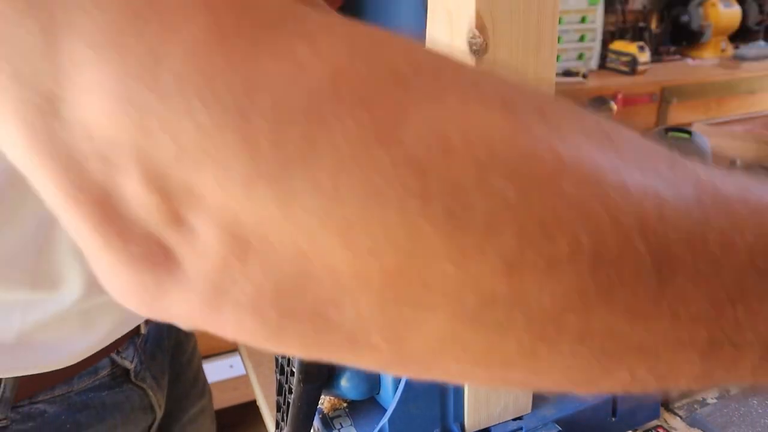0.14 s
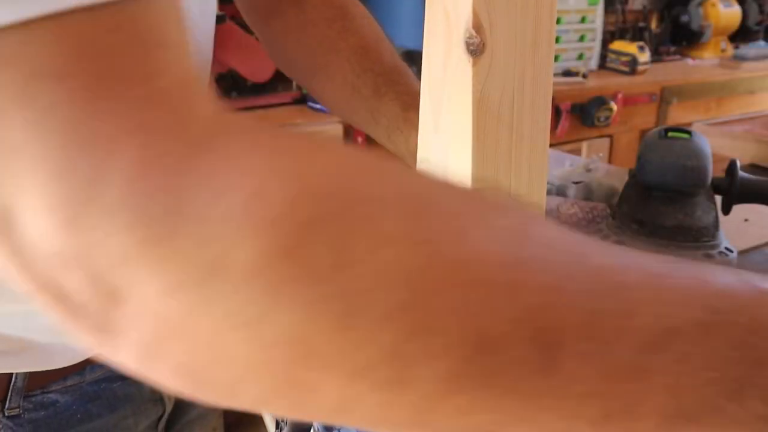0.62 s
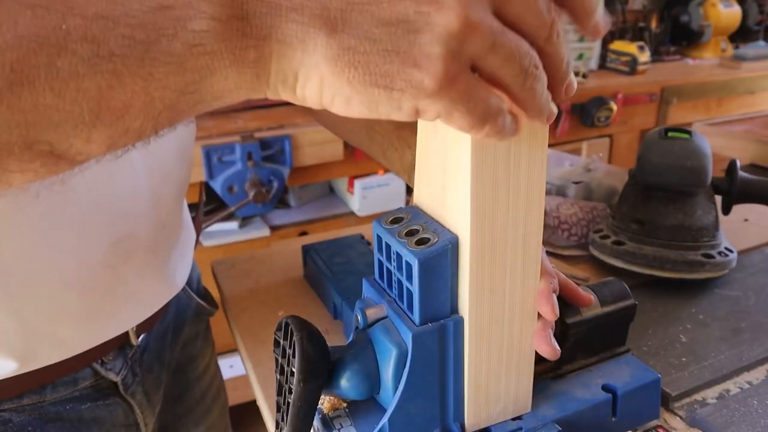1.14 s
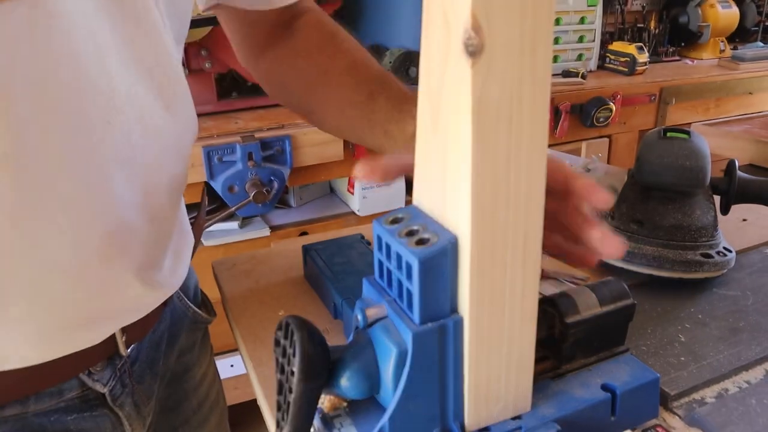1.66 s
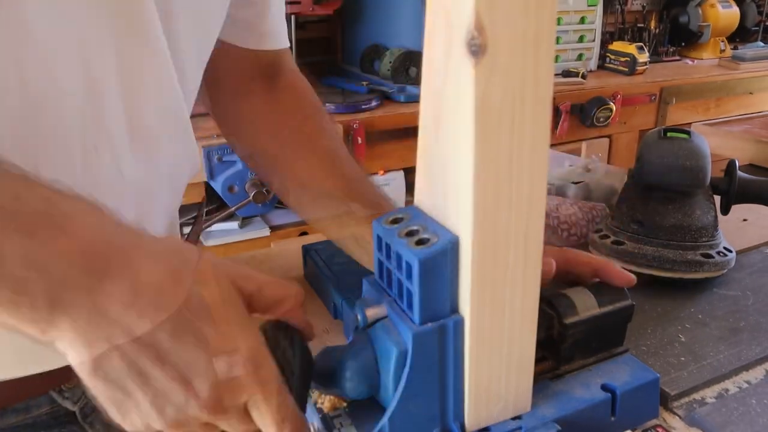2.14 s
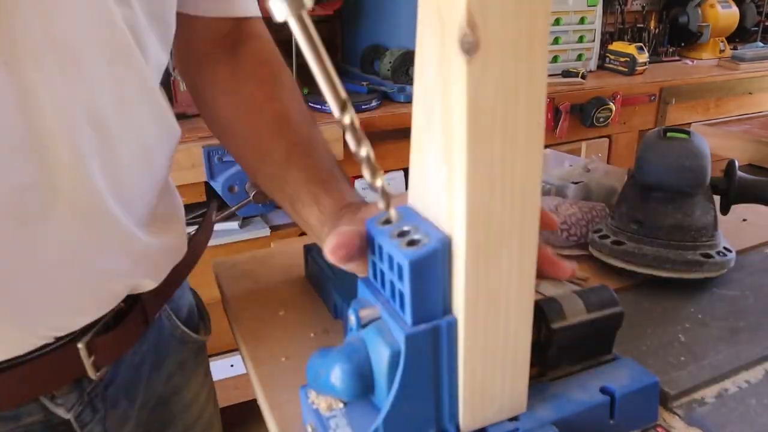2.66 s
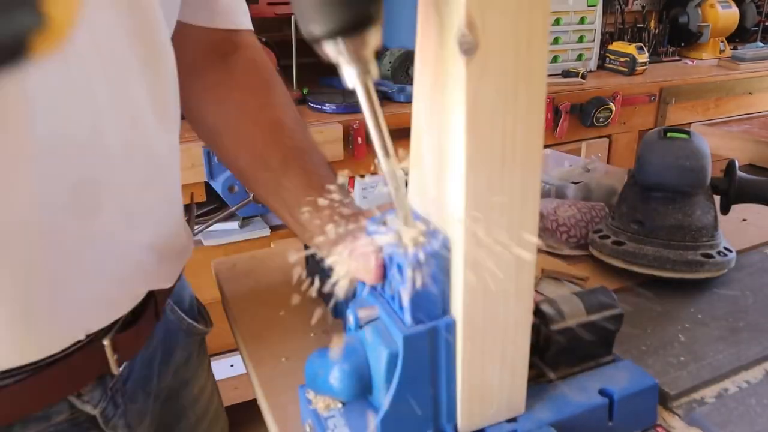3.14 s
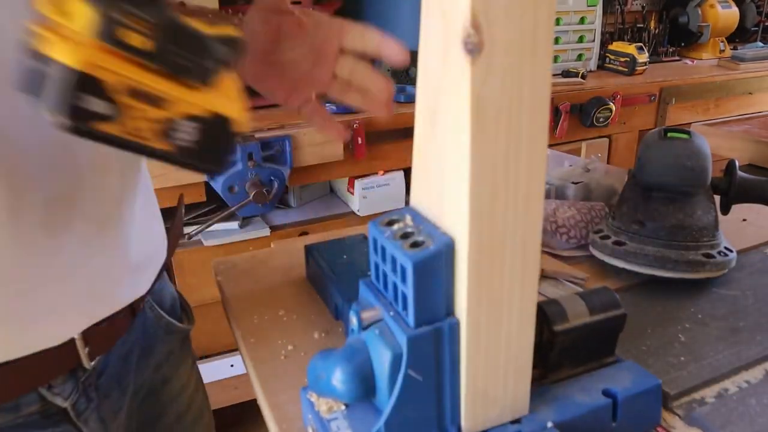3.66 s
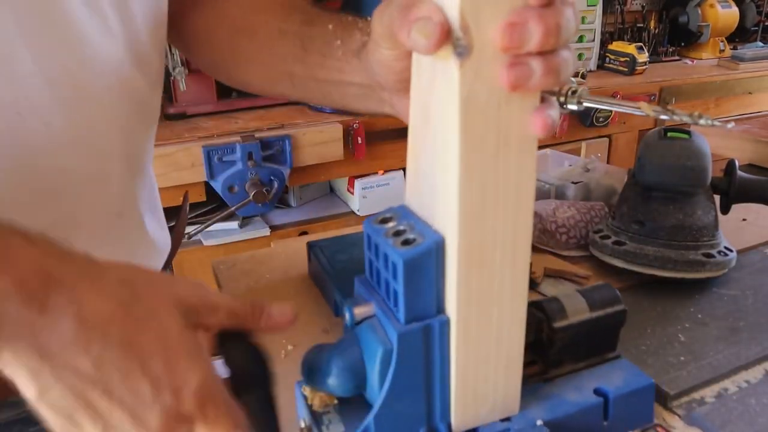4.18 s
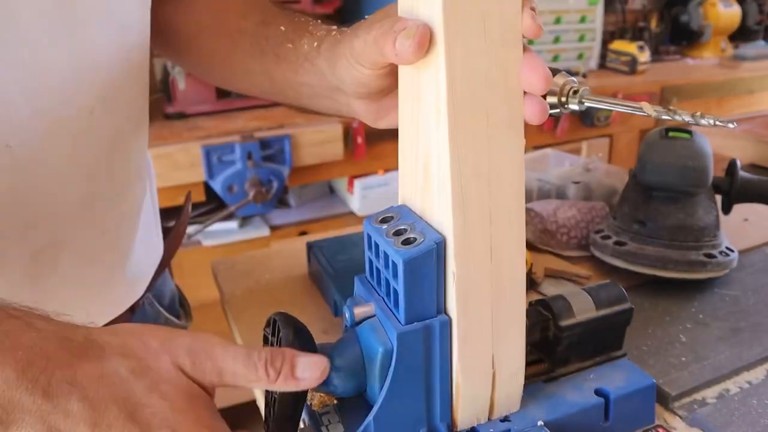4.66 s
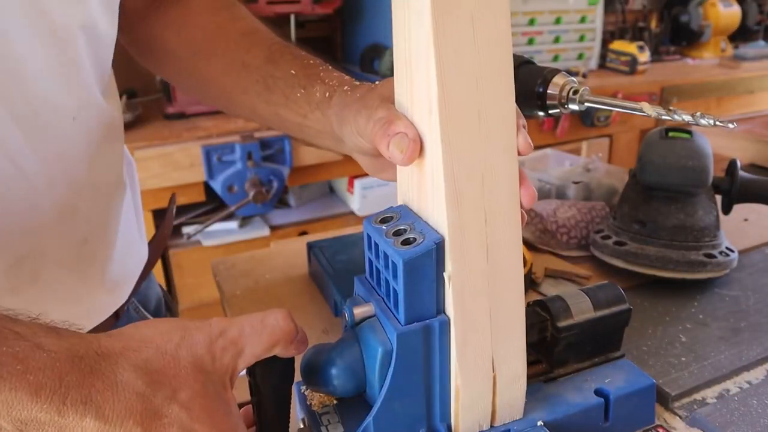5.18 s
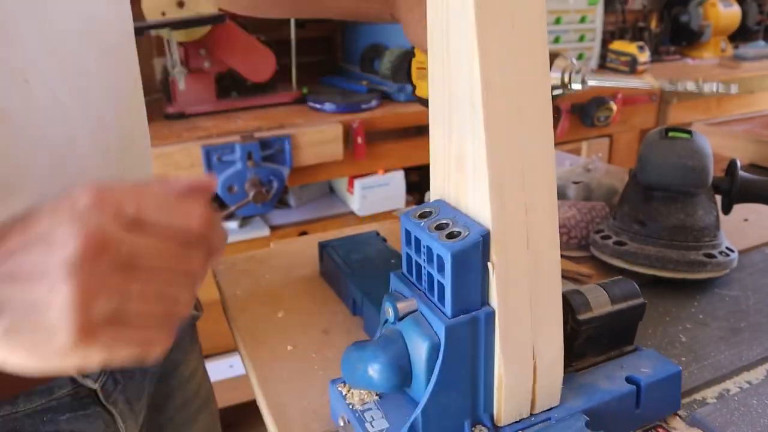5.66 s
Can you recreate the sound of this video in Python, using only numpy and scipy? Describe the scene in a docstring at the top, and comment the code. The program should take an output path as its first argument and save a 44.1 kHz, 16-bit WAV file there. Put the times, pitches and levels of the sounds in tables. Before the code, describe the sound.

Very close stereo at a workshop bench. A loud wooden crack comes early, followed by near quiet with soft cloth rustle and low puffs of air. More knocks and slides lead into a high-pitched cordless drill burst that bites wood twice and stops abruptly. Afterwards a clamp clacks open, the board knocks and scrapes, and a dense clatter with a bright metal chink ends it.

```python
"""Drilling two holes at a workshop bench

A cordless drill bores two holes in one short burst into a clamped board; its sound is built from
motor and gear tones over shaped noise. Before and after it the board, clamp and drill knock and scrape:
bursts of noise set off their resonances, and low thumps go with the heaviest knocks. Moving arms rustle
(flickering noise bands) and push puffs of air (low swings) onto a close stereo microphone whose treble
is wide and whose bass is centred."""
import sys
import numpy as np
from scipy import signal
from scipy.fft import rfft, irfft
from scipy.io import wavfile
from scipy.ndimage import uniform_filter1d

SR = 44100
rng = np.random.default_rng(int(sys.argv[2]) if len(sys.argv) > 2 else 0)


def transcribe(u):
    """Save the signal u as a 16-bit wav file named by the first command-line argument.

    u: samples, shape (n,) or (channels, n), limited to [-1, 1]; the rate is SR.
    q: integer samples, one column per channel.
    """
    v = np.clip(np.atleast_2d(u).T, -1, 1)
    q = np.round(v * 32767).astype(np.int16)
    wavfile.write(sys.argv[1], SR, q)


def boost(x):
    """Linear amplitude factor 10**(x/20) for a level x in decibels (scalar or array-like)."""
    u = np.asarray(x, float) / 20
    return 10 ** u


N = 255780  # length [samples]

# How hard the air is stirred: (time [s], level [dB], left minus right [dB])
AIR_STIR = [(0.0, -53, 2.5), (0.45, -48.5, 1), (0.53, -30, -1), (0.62, -45.5, 0.5), (0.98, -49.5, 2),
            (1.1, -48, 8.5), (1.42, -38.5, 9.5), (1.63, -44.5, 2), (1.95, -39, 5), (2.1, -41.5, -0.5),
            (2.45, -28.5, 0), (2.73, -37, 3.5), (2.96, -34.5, 0), (3.19, -38, -0.5), (3.22, -64, 4),
            (3.32, -56, 4), (3.35, -39, 3), (3.44, -35.5, -0.5), (3.6, -45, 6.5), (3.86, -54, 1.5),
            (4.15, -65, -1.5), (4.3, -40.5, 1), (4.39, -34, 1), (4.5, -49, 0), (5.0, -44, 0.5),
            (5.48, -34.5, 1.5), (5.56, -52, -3), (5.63, -27.5, 3), (5.8, -38.5, 0)]
# A body leaning past changes the deep boom: (time [s], added level [dB], half-width [s]); negative is a dip
BOOM_SWELLS = [(1.1, 17, 0.14), (1.4, 16.5, 0.14), (2.42, 19.5, 0.04), (2.68, 3.5, 0.14), (2.82, 12, .04),
               (4.12, -28.5, 0.19)]
# Puffs of air, and low thumps that go with the heaviest knocks:
# (time [s], peak before panning [dB], pitch [Hz])
PUFFS_AND_THUMPS = [(0.449, -10, 229), (0.4531, -11, 215), (1.053, -29, 150), (1.074, -27.5, 105),
                    (1.172, -27.5, 109), (1.207, -26, 145), (1.309, -20, 129), (1.366, -19, 182),
                    (1.391, -18, 181), (1.415, -25, 144), (1.451, -21, 122), (1.498, -27.5, 129),
                    (1.544, -33.5, 170), (1.673, -26.5, 122), (1.847, -22.5, 172), (1.871, -20, 287),
                    (1.888, -24.5, 139), (1.905, -18, 226), (1.953, -25.5, 147), (1.984, -30, 221),
                    (2.385, -14.5, 185), (2.396, -19, 185), (2.422, -19, 170), (3.713, -34, 234),
                    (3.868, -25, 214), (3.991, -38.5, 104.1), (4.298, -30, 240), (4.322, -28, 330),
                    (4.336, -20, 154), (4.347, -18, 300), (4.362, -24.5, 181), (4.378, -20, 357),
                    (4.395, -22, 420), (4.425, -33, 280), (4.438, -18, 260), (4.46, -29, 134),
                    (4.495, -29, 191), (4.519, -31, 237), (4.571, -23.5, 292), (4.579, -15.5, 300),
                    (4.613, -23, 226), (4.745, -23, 217), (4.783, -15, 360), (4.939, -26, 161),
                    (4.968, -20, 242), (5.046, -37.5, 164), (5.083, -19, 327), (5.153, -20.5, 175),
                    (5.207, -25, 102), (5.257, -24, 160), (5.292, -17, 168), (5.347, -20.5, 173),
                    (5.365, -14, 363), (5.404, -14.5, 187), (5.409, -17.5, 230), (5.452, -19, 220),
                    (5.497, -22, 252), (5.676, -15, 312), (5.682, -13, 280), (5.693, -17, 263),
                    (5.701, -20, 300), (5.713, -15.5, 332), (5.754, -15.5, 258), (5.766, -14, 460),
                    (5.791, -14.5, 420)]
# How busy the hands are: (time [s], level [dB])
HAND_RUSTLE = [(0.0, -59), (0.43, -58.5), (0.72, -53), (0.84, -61.5), (1.5, -56.5), (2.05, -52), (2.3, -42),
               (2.69, -45.5), (2.9, -51), (3.69, -76), (3.9, -58), (4.28, -53.5), (4.6, -48), (4.76, -48.5),
               (5.23, -52), (5.4, -44), (5.5, -34), (5.6, -38), (5.67, -56), (5.8, -51.5)]
# Sleeves brushing: (start [s], length [s], level [dB])
SLEEVE_SWISHES = [(0.0, 0.4, -59.5), (0.646, 0.071, -63), (1.03, 0.084, -65.5), (1.231, .1, -67.5),
                  (1.69, 0.18, -62), (2.074, 0.047, -64), (2.23, 0.11, -66), (2.452, 0.33, -61),
                  (2.79, 0.17, -67), (3.686, 0.33, -72.5), (4.004, 0.17, -69.5), (4.375, 0.17, -52),
                  (4.702, 0.12, -61.5), (5.103, 0.31, -64), (5.412, 0.41, -57)]
# A small metal part chinks and bounces: (time [s], peak [dB])
METAL_TICKS = [(5.562, -16.5), (5.5664, -1.5), (5.574, -17.5), (5.5805, -27.5), (5.586, -27)]

# Weight and brightness below are bass and treble relative to the peak of the middle band.
# Knocks on the board: (time [s], peak [dB], weight [dB], brightness [dB], time to fall 60 dB [s])
BOARD_KNOCKS = [(0.44, 0, -20.5, -10, 0.3), (0.455, -6, -8, -10, 0.08), (0.491, -10.5, -1.5, -6.5, 0.12),
                (0.648, -38, 3.5, -3, 0.033), (0.671, -36.5, -3, -1.5, 0.033), (0.69, -36, -20, -4, 0.086),
                (1.71, -39.5, -10, 2.5, 0.04), (2.193, -20.5, -15, -5, 0.11), (2.235, -15, 0, -8.5, 0.089),
                (2.368, -16, 6, -18.5, 0.42), (2.37, -23, -22, 12, 0.017), (2.439, -2, -4.5, -29, 0.085),
                (2.623, -24, -14, 6, 0.021), (2.885, -8.5, -29.5, -2.5, 0.055),
                (3.821, -18, -35.5, -17, 0.095), (4.298, -36, 6, 5, 0.043), (4.44, -34, -9, 2, .025),
                (4.539, -1.5, -17, -4.5, 0.065), (4.631, -0.5, -46, -5.5, 0.034),
                (4.681, -41.5, -11, 11.5, 0.034), (4.784, -22.5, -28, -13, 0.097),
                (4.842, -19, -39.5, -14, 0.064), (4.862, -22.5, -35, -17, 0.084),
                (5.318, -6.5, -39, -17.5, 0.07), (5.415, -13.5, -31, -1, 0.04), (5.431, -25, -5, -9.5, .03),
                (5.502, -15, -7, -13, .04), (5.511, -19, -11, 1, 0.025), (5.545, -13.5, -26, 5, 0.033),
                (5.566, -16.5, -9, 5.5, 0.038), (5.629, -10.5, -4, -19, 0.15), (5.644, -7, -4.5, -9.5, 0.1),
                (5.651, -14, -11, -7, 0.03), (5.681, -19, -3, -19, 0.055), (5.697, -22, 6, -17.5, 0.077),
                (5.715, -25, -13, -13, .04), (5.736, -28.5, -5, -12.5, .025), (5.766, -31, 4, -20, .05),
                (5.792, -17.5, -19, -10, 0.043)]
# Blows on the metal clamp: (time [s], peak [dB], weight [dB], brightness [dB], time to fall 60 dB [s])
CLAMP_KNOCKS = [(4.0695, -11, -21, 1, 0.04), (4.991, -12, -18, -5, 0.035)]
# The brake snaps in the drill's casing and rebounds:
# (time [s], peak [dB], weight [dB], brightness [dB], time to fall 60 dB [s])
BRAKE_SNAPS = [(3.6643, -19.5, -20, 9.5, .01), (3.6805, -42, -20, 10, 0.0084)]
# The clamp lever springs open: (time [s], peak [dB], weight [dB], brightness [dB], time to fall 60 dB [s])
LEVER_SPRINGS = [(4.247, -10, -18.5, 4.2, 0.019)]
# Slides along the board, and the rattling tail of the first knock:
# (time [s], peak [dB], weight [dB], brightness [dB], length [s])
BOARD_SLIDES_AND_RATTLE = [(0.451, -12.5, 2.5, -13, 0.033), (0.471, -17, -5, -8.5, 0.026),
                           (0.505, -17.5, -2.5, -10, 0.027), (2.246, -24.5, -3, -16, 0.03),
                           (2.285, -29.5, -3, -7, 0.03), (2.325, -26.5, -5, -2.5, 0.025),
                           (2.354, -12, -20, -14, 0.017), (2.45, -4.5, -25, -17, 0.012),
                           (2.586, -33.5, 10.5, 8, 0.011), (2.665, -28, -12, 1.5, 0.0084),
                           (2.856, -19, -12, -6.5, 0.012), (2.869, -9, -3.5, -13.5, 0.014),
                           (3.823, -22.5, 1, -10.5, 0.0093), (4.049, -18.5, -21, -16, 0.029),
                           (4.2, -11.5, -21.5, -7, 0.025), (4.233, -9, -3, -12, 0.01),
                           (4.491, -38.5, -4, 5, 0.02), (4.718, -26.5, -13, -17, 0.019),
                           (5.063, -27, 1.5, -15, 0.0077), (5.177, -32, -15, 7, 0.011),
                           (5.383, -21.5, -10, -6.5, 0.011), (5.452, -14, -2, -12.5, 0.026),
                           (5.47, -13.5, -10, -7, 0.0089), (5.499, -17.5, -3, -23, 0.016),
                           (5.575, -15, -18, -15, 0.012), (5.616, -17, -13, -1, 0.031),
                           (5.653, -16.5, -2, -13, 0.034)]
# Slides along the metal clamp, and the soft onset and tail of the clamp blow:
# (time [s], peak [dB], weight [dB], brightness [dB], length [s])
CLAMP_SLIDES_AND_TAIL = [(4.063, -12.5, -15.5, 0.5, 0.008), (4.221, -10.5, -5.5, -7.5, 0.021),
                         (4.077, -24.5, -18, -12, 0.02), (4.15, -30.5, -9.5, -9, 0.01),
                         (5.024, -30.5, -12, -7, 0.011), (5.526, -18, -22, -12, 0.012)]
# Resonances of the board: (pitch [Hz], width [Hz], level [dB])
BOARD_BODY = [(226, 124, 2), (420, 186, 0), (721, 304, 6.5), (860, 130, -9.5), (1117, 230, -18.5),
              (1615, 2000, -22), (1790, 940, -13.5), (2455, 190, -20), (2840, 240, -19), (3196, 210, -12.5),
              (3670, 110, -32.5), (4490, 3000, -16.5), (4640, 780, -20)]
# Resonances of the clamp: (pitch [Hz], width [Hz], level [dB])
CLAMP_BODY = [(804.4, 370, -5.5), (1204, 200, 0.5), (2140, 450, 0.5), (2770, 170, -12), (3820, 170, -10),
              (4460, 350, -27)]
# Resonances of the drill's casing: (pitch [Hz], width [Hz], level [dB])
CASING_BODY = [(1464, 500, -11), (3060, 620, 1.5), (3770, 500, 3), (4190, 600, 1)]
# Resonances of the clamp lever: (pitch [Hz], width [Hz], level [dB])
LEVER_BODY = [(812, 250, -3.5), (1880, 200, 0), (3100, 240, 0), (4200, 160, -8.5)]

# The two holes: (bit bites [s], bit is pulled back [s], whine as it bites [dB], lower-gear growl at full depth [dB])
DRILLED_HOLES = [(2.93, 3.111, -17.5, 2.5), (3.364, 3.531, -21.5, 17)]
# Lines of the motor whine: (multiple of the whine pitch [ratio], level [dB])
WHINE_LINES = [(1, 3), (.986, -10), (1.015, -24)]
# Tone colour of the rush as it is heard, with its top cut off steeply: (pitch [Hz], level per Hz [dB])
HEARD_RUSH_COLOUR = [(290, -57.5), (500, -14), (1530, -8), (1830, -7.5), (2010, -10.5), (3640, -10.5),
                     (3960, -10.5), (5140, -13.5), (10100, -13.5), (11800, -9), (12300, -15.5),
                     (14500, -51)]
# Tone colour of the chips: (pitch [Hz], level per Hz [dB])
CHIP_COLOUR = [(150, -29), (400, -4.5), (1300, -8.5), (3000, -11.5), (4500, -34)]
# Bands in which wood fibres tear by turns: (low edge [Hz], high edge [Hz])
TEAR_BANDS = [(150, 700), (700, 1700), (1700, 4500)]

# Stereo width of the air: (pitch [Hz], side filter gain [dB])
AIR_WIDTH = [(60, -25), (200, -23), (700, 3.5)]
# Stereo width of hands and contacts: (pitch [Hz], side filter gain [dB])
HANDS_WIDTH = [(60, -30), (300, -28.5), (700, -18), (1300, -3.5), (4400, 4.5), (15000, 8.5)]
# Stereo width of the drill and ticks: (pitch [Hz], side filter gain [dB])
DRILL_WIDTH = [(60, -9), (300, -21.5), (1300, -7), (4400, -1), (15000, -1)]

# Moments of the drill [s]; it coasts from LET_GO_S to STOP_S
TRIGGER_S, LET_GO_S, STOP_S, BRAKE_S = 2.918, 3.625, 3.65, 3.664
# Levels: (running free [dB], added while cutting [dB], added by the starting jolt [dB])
RUSH_DB, CUT_DB, SIZZLE_DB = (-31, 3, 5.5), (-43, 8, 13), (-43, 6, 2.5)
MESH_DB, LOWER_DB = (-28.5, -8.5, 5), (-35, -9.5, 0)
GEAR_COAST_SLIP_PER_S = 1.1  # share of pitch lost per second: the gears wind down faster than the whine


def level(x):
    """Scale to an rms of one, judged on the first row."""
    return x / np.sqrt(np.mean(np.atleast_2d(x)[0] ** 2))


def band_level(x, lo_hz, hi_hz):
    """Scale so that one band of the first row has an rms of one."""
    return x / np.std(band(x[0], lo_hz, hi_hz))


def curves(table):
    """Draw straight lines between table rows, one value per sample for each column."""
    s, *columns = np.transpose(table)
    return [np.interp(np.arange(N) / SR, s, column) for column in columns]


def colour(x, points):
    """Filter a sound by (pitch [Hz], gain [dB]) points."""
    hz, db = np.transpose(points)
    f = np.fft.rfftfreq(x.shape[-1], 1 / SR) + 1
    gain = boost(np.interp(np.log(f), np.log(hz), db))
    return irfft(rfft(x) * gain, x.shape[-1])


def band(x, lo_hz, hi_hz):
    """Keep only the sound between two pitches."""
    return signal.sosfilt(signal.butter(2, [lo_hz, hi_hz], "band", fs=SR, output="sos"), x)


def hiss(lo_hz, hi_hz):
    """Two unrelated noises in one band, for mid and side."""
    return level(band(rng.standard_normal((2, N)), lo_hz, hi_hz))


def walk(rate):
    """Random levels held for 1 / rate seconds, then smoothed twice; rms of one."""
    k = int(SR / rate)
    steps = np.repeat(rng.standard_normal(N // k + 1), k)
    return level(uniform_filter1d(uniform_filter1d(steps, k), k)[:N])


def fall_db(t, start, t60):
    """Level in dB that falls steadily after start, by 60 dB every t60 seconds."""
    return -60 * np.maximum(t - start, 0) / t60


def bump(t, centre, width):
    """A smooth hump of height one."""
    return np.exp(-((t - centre) / width) ** 2)


def after(t, start, tau):
    """A jump to one at start that dies away exponentially."""
    return (t >= start) * np.exp(-np.maximum(t - start, 0) / tau)


def add(out, s, sound):
    """Mix a short sound in at s seconds."""
    i = int(s * SR)
    out[:, i:i + sound.shape[1]] += sound[:, :N - i]


def sides(pan_db):
    """Left and right gains whose ratio is pan_db."""
    return boost(np.array([pan_db, -pan_db]) / 2)


def stereo(mid_side, width):
    """Left and right from mid and side; the width table sets how much side each pitch gets."""
    return mid_side[0] + np.array([[1], [-1]]) * colour(mid_side[1], width)


def puffs_and_thumps(pan_db):
    """Air hitting the microphone and the thump of heavy knocks: one or two low swings, gone at once."""
    out, t = np.zeros((2, N)), np.arange(2048) / SR
    turns_per_db = 0.03  # a one-sided swing reaches the far port late
    for (s, db, hz), turn in zip(PUFFS_AND_THUMPS, rng.random(len(PUFFS_AND_THUMPS))):
        x = t * hz / 0.43
        ports = turn + turns_per_db * pan_db[int(s * SR)] * np.array([[.5], [-.5]])
        swing = x ** 2 * np.exp(-2 * x) * np.sin(2 * np.pi * (hz * t + ports))
        swing = band(swing, 92, 1740)
        add(out, s, boost(db) * swing / np.abs(swing).max())
    return out


def air():
    """Stirred air: a deep centred boom, a lumpy flutter above it and single low swings, at times one-sided."""
    (stir_db, pan_db), t = curves(AIR_STIR), np.arange(N) / SR
    boom_db = -53 + 0.28 * (stir_db + 48.0)  # -53 dB where the stir is -48 dB
    boom_db = boom_db + sum(db * bump(t, s, width) for s, db, width in BOOM_SWELLS)
    narrow = level(band(hiss(45.7, 50.8)[0], 40, 59.6))
    boom = boost(boom_db) * level(narrow + 2.3 * hiss(30, 75)[0])
    flutter = boost(stir_db) * level(boost(4.2 * walk(45)) * hiss(50, 298))
    return boom + sides(pan_db) * (stereo(flutter, AIR_WIDTH) + puffs_and_thumps(pan_db))


def swishes():
    """Sleeves brushing: loudness that rises and falls smoothly for each stroke."""
    t, out = np.arange(N) / SR, 0
    for s, length, db in SLEEVE_SWISHES:
        edge_s = 0.33 * length  # time to fade in or out
        inside = np.minimum(t - s, s + length - t)
        out = out + boost(db) * np.clip(inside / edge_s + .5, 0, 1) ** 2
    return out


def rustle():
    """Hands rustle low and sleeves swish high: three noise bands that partly flicker together."""
    (busy_db,), swish = curves(HAND_RUSTLE), swishes()
    low = boost(busy_db)
    middle = boost(-61 + 0.75 * (busy_db + 50.0)) + boost(-6.5) * swish  # hands part: -61 dB at a busyness of -50
    top = boost(-76.5) + swish
    out, flicker = 0, walk(40)
    for gain, lo_hz, hi_hz in ((low, 400, 1610), (middle, 2000, 5130), (top, 6200, 13600)):
        flicker_db = 1.5 * flicker + 1.2 * walk(15)
        out = out + gain * boost(flicker_db) * hiss(lo_hz, hi_hz)
    return stereo(out, HANDS_WIDTH)


def shudder():
    """The bench top shudders once: a low tone that swells and rings out, lopsided when it swings hard."""
    peak_s, db, hz, rise_s, t60 = 2.585, -18, 51, 0.065, 0.75
    octave_db = -9.5
    t = np.arange(N) / SR - peak_s
    envelope = np.where(t < 0, np.exp(-(t / rise_s) ** 2), boost(fall_db(t, 0, t60)))
    phase = 2 * np.pi * hz * t + .4 * walk(13)
    return boost(db) * envelope * (np.sin(phase) + boost(octave_db) * envelope * np.sin(2 * phase))


def ticks():
    """A small metal part chinks and bounces: dry treble clicks of quickly fading noise."""
    out, t = np.zeros((2, N)), np.arange(512) / SR
    for s, db in METAL_TICKS:
        click = band(rng.standard_normal((2, len(t))) * np.exp(-t / 0.00073), 5800, 13000)
        add(out, s, boost(db) * stereo(click / np.abs(click[0]).max(), DRILL_WIDTH))
    return out


def resonances(body, size):
    """How strongly a body answers each pitch, with its modes slightly detuned for every contact."""
    f = np.fft.rfftfreq(size, 1 / SR) + 1
    detune = 1 + .025 * rng.standard_normal(len(body))
    modes = 0
    for k, ((hz, width, db), d) in enumerate(zip(body, detune)):
        modes = modes + (-1) ** k * boost(db) / (1 + 1j * (f - (hz * d) ** 2 / f) / width)
    # countless small modes fill the valleys between the strong ones
    return modes + boost(-24.0) / (1 + 1j * f / 4000)


def ring(body, envelope, db, part_dbs, tick, top_fade):
    """A tick and a noisy contact force ring a body's modes; the contact itself is heard at the top."""
    size = len(envelope)
    modes = resonances(body, size)
    force = rng.standard_normal((2, size))
    force[:, 50:56] += tick * np.array([[1], [.4]]) * np.hanning(8)[1:-1]
    blow = np.zeros((2, size))  # the slower push of the whole part rings the low modes
    blow[:, 50:74] = 1.5 * tick * np.array([[1], [.3]]) * np.hanning(24)
    solid = irfft(rfft((force + blow) * envelope) * modes, size)
    rattle = irfft(rfft(force * envelope ** .8) * modes, size)  # loose parts keep the treble rattling longer
    parts = (band(solid, 312, 1840), band(solid, 89, 440), band(rattle, 1300, 6500),
             band(force * envelope ** top_fade, 6000, 10500))
    out = 0
    for part, part_db in zip(parts, (0, *part_dbs)):
        out = out + boost(db + part_db) * part / np.abs(part[0]).max()
    return stereo(out, HANDS_WIDTH) * np.linspace(1, 0, size)


def contact(weight_db, bright_db, top_db):
    """Bass, treble and top of one contact; the top follows the brightness."""
    return weight_db, bright_db, top_db + 1.14 * bright_db


def knocks(table, body, crack_s=0.0022):
    """Sharp blows: a hard first few milliseconds, then rattling that fades."""
    out, t = np.zeros((2, N)), np.arange(16384) / SR
    for s, db, weight_db, bright_db, t60 in table:
        attack = np.minimum(t / 0.0021, 1) ** 1.54
        envelope = attack * (np.exp(-t / crack_s) + 0.26 * boost(fall_db(t, 0, t60)))
        parts = contact(weight_db, bright_db, top_db=-11.5)
        add(out, s, ring(body, envelope, db, parts, tick=2.4, top_fade=1.7))
    return out


def scrapes(table, body):
    """Short slides, and the soft parts of some blows: the force swells, holds unevenly and lets go."""
    out, t = np.zeros((2, N)), np.arange(8192) / SR
    for s, db, weight_db, bright_db, length in table:
        catches = boost(5.65 * np.repeat(rng.standard_normal(128), 64))
        swell = np.minimum(t / 0.0012, 1) * np.minimum(0.35 + t / length, 1)
        envelope = swell * boost(fall_db(t, length, 0.025)) * catches
        parts = contact(weight_db, bright_db, top_db=-10.5)
        add(out, s, ring(body, envelope, db, parts, tick=0, top_fade=1.0))
    return out


def motor():
    """The motor spins up, sags and grows muffled as the bit sinks, races when freed and coasts at the end."""
    t = np.arange(N) / SR
    free_hz, spin_up_hz, spin_up_s = 11435, 1964, .029  # whine pitch, how far below it starts, time to rise
    sag_hz, overshoot_hz, settle_s = 300, 330, .08  # sag at full depth; the freed motor races, then settles
    free_whine_db, buried_db = -25, -13.5
    bite_s, clear_s = .02, 0.13  # cutting fades in before the bite and out after the pull
    coast = np.clip(t - LET_GO_S, 0, STOP_S - LET_GO_S)  # seconds spent coasting
    lag = np.exp(-(np.maximum(t - TRIGGER_S, 0) / spin_up_s) ** 1.5)
    hz = free_hz - spin_up_hz * lag - 7700 * coast
    # the whine is faint until the motor is nearly up to speed
    whine_db = free_whine_db - 30 * np.exp(-((t - TRIGGER_S) / spin_up_s) ** 4) - 300 * coast
    cutting, depth, growl_db = 0, 0, 0
    for bite, pull, db, deep_db in DRILLED_HOLES:
        inside = (t >= bite) & (t < pull)
        sunk = inside * (t - bite) / (pull - bite)
        hz = hz - sag_hz * sunk + overshoot_hz * after(t, pull, settle_s)
        whine_db = whine_db + inside * (db - free_whine_db) + buried_db * (sunk + after(t, pull, 0.018))
        cutting = cutting + np.clip(np.minimum((t - bite) / bite_s + 1, (pull - t) / clear_s + 1), 0, 1)
        depth = depth + sunk
        growl_db = growl_db + deep_db * (sunk + after(t, pull, 0.052))
    hz = uniform_filter1d(hz, size=700)  # the rotor's inertia smooths every change
    return hz, whine_db, cutting, depth, growl_db, after(t, TRIGGER_S, 0.034), coast


def tones(turns, orders, blur, waver_db):
    """Lines at multiples of a rotation; each wobbles in phase and level, differently in mid and side."""
    out = np.zeros((2, N))
    for row in out:
        for k, db in orders:
            loudness = np.sqrt(2) * boost(db + waver_db * walk(90))
            row += loudness * np.sin(2 * np.pi * k * turns + blur * walk(160))  # blur in radians
    return out


def motor_whine(hz, whine_db, cutting):
    """The high motor tone, blurred more while the bit cuts."""
    t = np.arange(N) / SR
    lines = tones(np.cumsum(hz) / SR, WHINE_LINES, blur=.7 + 1.4 * cutting, waver_db=4.0)
    return boost(whine_db + fall_db(t, STOP_S, .02)) * lines


def gear_mesh(hz, mesh_db, cutting, depth, coast):
    """Meshing gear teeth: quieter and more wobbly in the cut, then louder and lower with depth."""
    t = np.arange(N) / SR
    mesh_hz = .349 * hz * (1 - .035 * depth - GEAR_COAST_SLIP_PER_S * coast)
    grab_db = 11.5 * bump(t, 2.937, 0.014)  # the gears sing out as they take up the slack
    gain_db = mesh_db + 6 * depth + fall_db(t, STOP_S, .02) + 58.5 * coast + grab_db
    return boost(gain_db) * tones(np.cumsum(mesh_hz) / SR, [(1, 0.0058)], 0.8 + 1.2 * cutting, waver_db=2.0)


def lower_gears(lower_db, growl_db, coast):
    """A growling lower gear, and a still lower gear tone while the first hole is cut."""
    t = np.arange(N) / SR
    labour = .12 * bump(t, 3.48, .04)  # it labours and drops in pitch deep in the second hole
    growl_hz = 1995.84 * (1 - labour - GEAR_COAST_SLIP_PER_S * coast)
    growl = boost(lower_db + growl_db) * tones(np.cumsum(growl_hz) / SR, [(1, 0.0025)], blur=1.2, waver_db=2.5)
    bite, pull = DRILLED_HOLES[0][:2]
    first = np.clip(np.minimum(t - bite, pull - t) / 0.03, 0, 1)
    return growl + first * boost(-34.5) * tones(1276 * t, [(1, 0.0037)], blur=1.2, waver_db=1.5)


def motor_rush(rush_db):
    """Rushing noise that loose teeth and brushes make slightly gritty."""
    grit = boost(1.0 * walk(900) + 1.7 * walk(50)) * rng.standard_normal((2, N))
    return boost(rush_db) * band_level(colour(grit, HEARD_RUSH_COLOUR), 6500, 10000)


def tearing_wood(cut_db, sizzle_db, cutting, depth):
    """Chips crackle, splinters snap at random and fibres tear by turns; packed flutes rasp louder."""
    chips = boost(4.0 * walk(300) + 1.2 * walk(60)) * rng.standard_normal((2, N))
    snaps = rng.random(N) < 250 / SR  # 250 splinters per second on average, before the cutting gain
    splinters = snaps * cutting * boost(19.0) * rng.standard_normal((2, N))
    torn = 0
    for lo, hi in TEAR_BANDS:
        thump_loss_db = (lo < 200) * 6.5 * (1 - cutting)  # the lowest tearing is weaker in free running
        torn = torn + boost(1.7 * walk(45) - thump_loss_db) * band(chips + splinters, lo, hi)
    packed = uniform_filter1d(depth, size=2000)
    cut = boost(cut_db + 3 * packed) * band_level(colour(torn, CHIP_COLOUR), 300, 1500)
    sizzle = boost(sizzle_db + 9.5 * packed) * level(band(chips, 4000, 6200))
    return cut + sizzle


def drill():
    """Whine and gear tones over a grainy rush; chips crackle in the cut; the brake stops it dead."""
    hz, whine_db, cutting, depth, growl_db, jolt, coast = motor()
    t = np.arange(N) / SR
    rush_db, cut_db, sizzle_db, mesh_db, lower_db = (
        free + load * cutting + kick * jolt - 100 * coast
        for free, load, kick in (RUSH_DB, CUT_DB, SIZZLE_DB, MESH_DB, LOWER_DB))
    sound = motor_whine(hz, whine_db, cutting) + gear_mesh(hz, mesh_db, cutting, depth, coast)
    sound = sound + lower_gears(lower_db, growl_db, coast) + motor_rush(rush_db)
    sound = sound + tearing_wood(cut_db, sizzle_db, cutting, depth)
    start = np.clip((t - TRIGGER_S) / 0.0034, 0, 1)
    running = start * boost(fall_db(t, STOP_S, 0.14) + fall_db(t, BRAKE_S, 0.02))
    return running * stereo(sound, DRILL_WIDTH)


def scene():
    """Everything at the bench, added together."""
    background = air() + rustle() + shudder() + ticks()
    blows = knocks(BOARD_KNOCKS, BOARD_BODY) + knocks(CLAMP_KNOCKS, CLAMP_BODY)
    blows = blows + knocks(BRAKE_SNAPS, CASING_BODY, crack_s=0.0013)
    blows = blows + knocks(LEVER_SPRINGS, LEVER_BODY, crack_s=0.0014)
    softer = scrapes(BOARD_SLIDES_AND_RATTLE, BOARD_BODY) + scrapes(CLAMP_SLIDES_AND_TAIL, CLAMP_BODY)
    return background + blows + softer + drill()


def band_limit(x):
    """A steep low-pass at the top of the band."""
    return signal.sosfilt(signal.butter(12, 15870, fs=SR, output="sos"), x)


def record(dry):
    """The microphone loses the top above 13 kHz and rounds the hardest peaks."""
    soft = signal.sosfilt(signal.butter(4, 13000, fs=SR, output="sos"), dry)
    mix = np.tanh(0.59 * soft) / 0.57
    return band_limit(mix)


dry = scene()
out = record(dry)
transcribe(out)
```